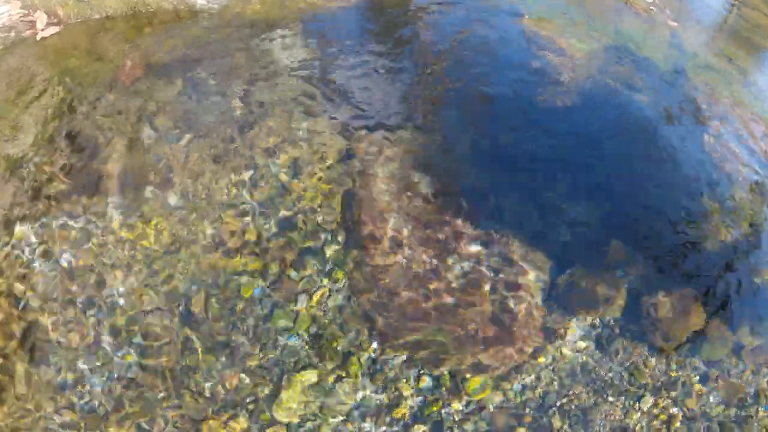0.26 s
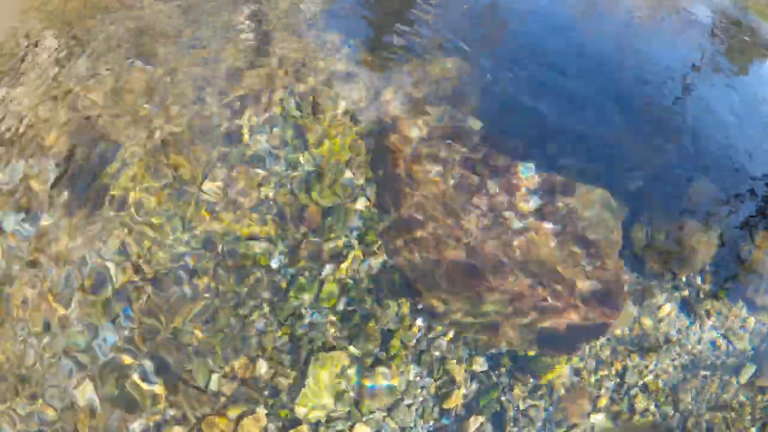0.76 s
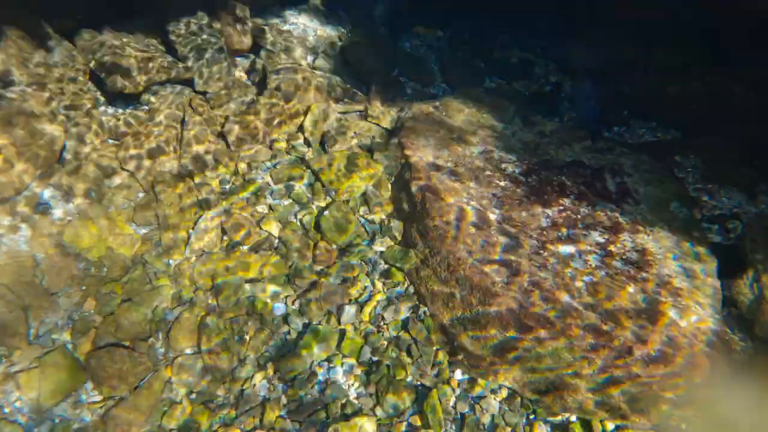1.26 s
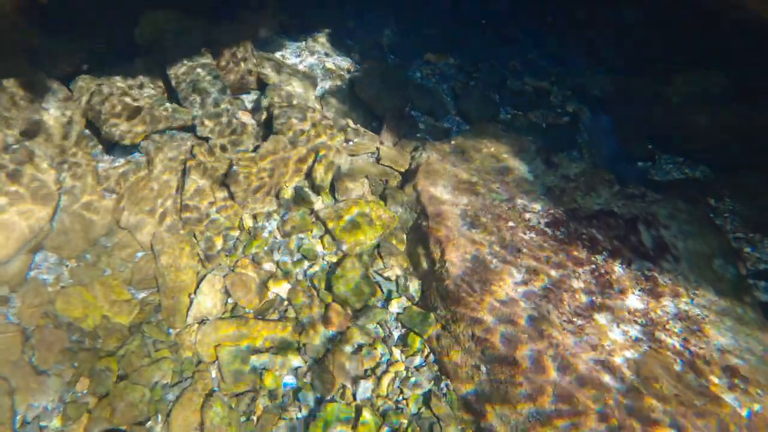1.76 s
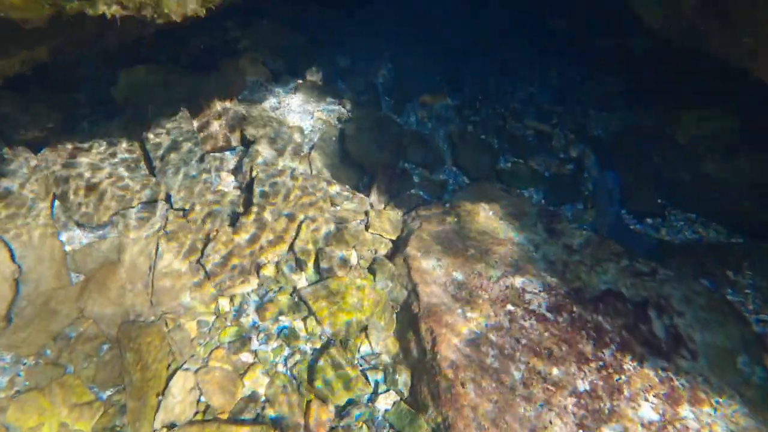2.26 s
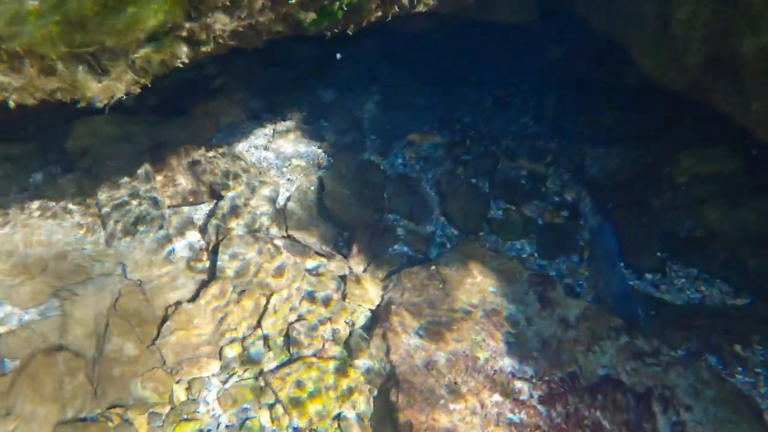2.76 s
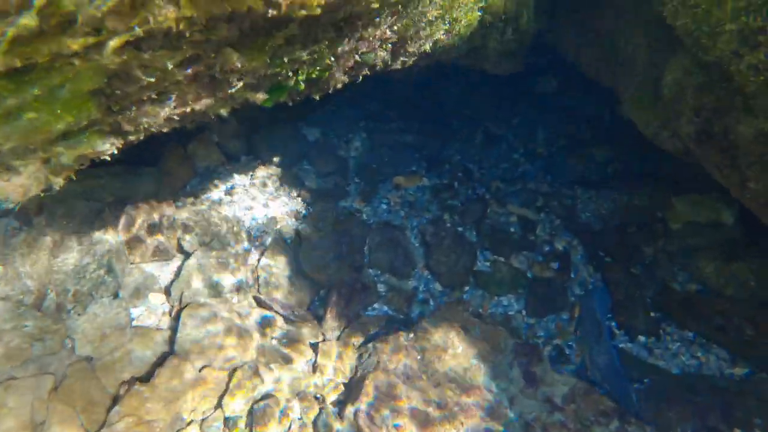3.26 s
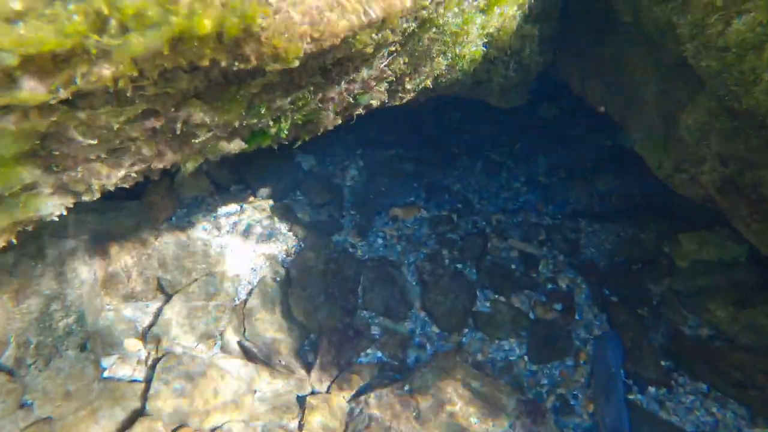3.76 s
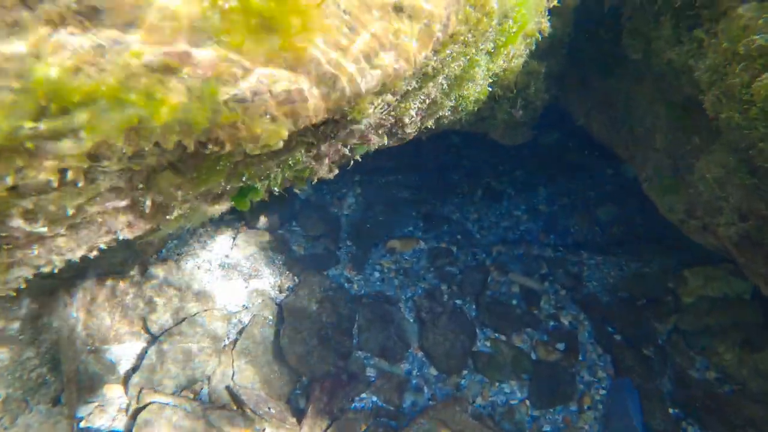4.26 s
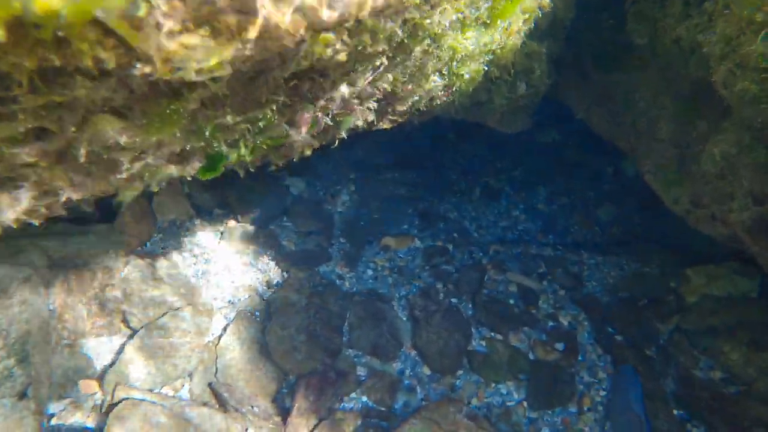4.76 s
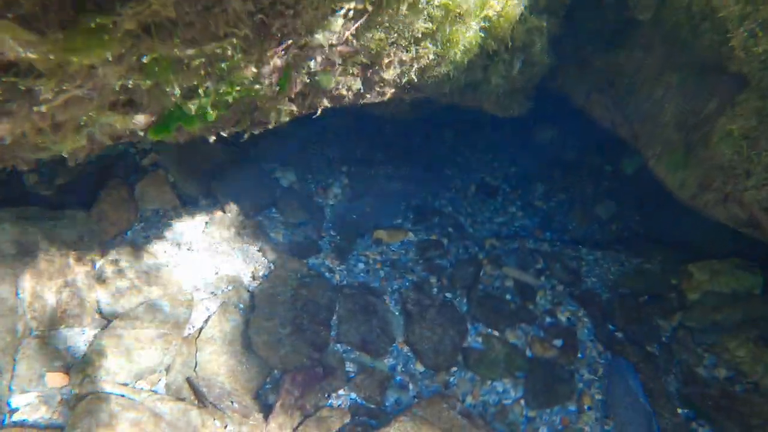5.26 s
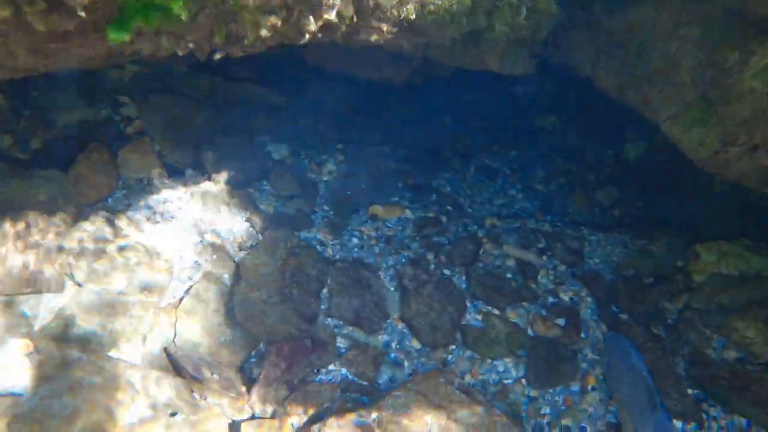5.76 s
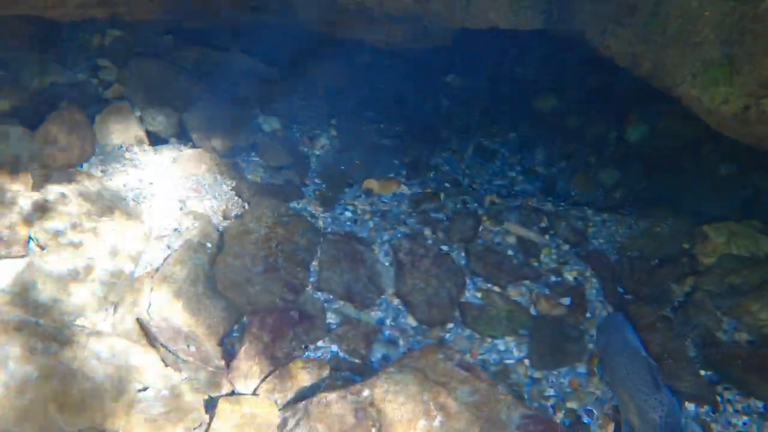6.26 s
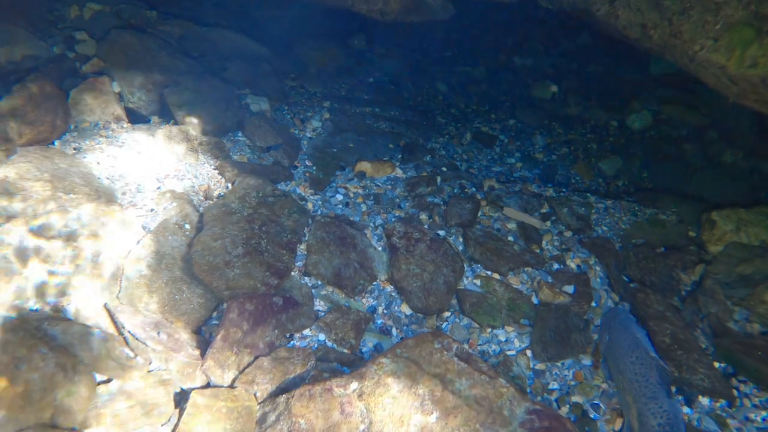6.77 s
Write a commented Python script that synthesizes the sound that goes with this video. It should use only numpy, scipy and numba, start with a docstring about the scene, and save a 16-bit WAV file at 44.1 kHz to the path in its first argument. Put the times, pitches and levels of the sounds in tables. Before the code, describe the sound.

A soft, low breeze blows across the microphone for the first second. At about 1.1 seconds drops patter and a short, bright splash follows as the camera enters a pool, going under at 1.3 with a loud gulp and a rush of bubbles lasting until about 1.9. From here the sound is close and muffled. An uneven deep rumble continues throughout, with a wavering low throb until 3.5 seconds. The flow is quieter between 2 and 3.4, with only a few small pops. Gurgling surges come at about 3.7 and 4.2, followed by busy bubble pops and clicks until 5.5, while a hollow watery resonance gradually sinks in pitch. The bubbling then thins out. From 6.5 to 7 seconds the camera pole creaks in a quick run of dry knocks with faint scraping over the rumble.

```python
"""A camera dipped into a spring pool

A camera on a hollow pole is lowered through a breeze, slaps into the water and is pushed under.
Eddies shed from its case throb and rumble, and the flow excites an air pocket whose resonances sink
with depth. Bubbles break loose from the joints and ring as damped oscillators; late on, the pole creaks."""
import sys
import numpy as np
from scipy import signal
from scipy.io import wavfile
from scipy.ndimage import uniform_filter1d, map_coordinates
from numba import njit

SR = 44100
rng = np.random.default_rng(int(sys.argv[2]) if len(sys.argv) > 2 else 0)


def put_to_file(sound):
    """Save the sound as 16-bit audio at rate SR, in the file named by the first command-line argument."""
    columns = np.atleast_2d(sound).T  # one column per channel
    safe = np.clip(columns, -1, 1)
    whole_steps = np.round(safe * 32767)
    wavfile.write(sys.argv[1], SR, whole_steps.astype(np.int16))


N = 309582
TIME = np.arange(N) / SR
UNDER_S = 1.3  # the case goes under


def undb(db):
    return 10 ** (np.asarray(db) / 20)


def unit(x):
    return x / np.sqrt(np.mean(x ** 2))


def curves(table):
    """Linear interpolation of each column over time."""
    s, *columns = np.transpose(table)
    return [np.interp(TIME, s, c) for c in columns]


def during(table, fade_s=.054):
    """Trapezoidal gate, open over the span of a table."""
    start, end = table[0][0], table[-1][0]
    return np.interp(TIME, [start - fade_s, start, end, end + fade_s], [0, 1, 1, 0])


def swell(s, db, rise_s, fall_s):
    """Exponential growth and decay, 20 dB per rise or fall time."""
    t = TIME - s
    return undb(db - 20 * np.maximum(-t / rise_s, t / fall_s))


def walk(rate):
    """Slow random modulation: smoothed steps, rate per second, spread near 1."""
    hold = int(SR / rate)
    steps = np.repeat(rng.standard_normal(N // hold + 1), hold)
    return 1.367 * uniform_filter1d(uniform_filter1d(steps, hold), hold)[:N]


@njit
def resonator(x, hz, width):
    """State-variable band-pass with unit gain at its moving centre."""
    y, band_state, low_state = np.empty(len(x)), 0., 0.
    for i in range(len(x)):
        g, damping = np.tan(np.pi * hz[i] / SR), width / hz[i]
        v = (band_state + g * (x[i] - low_state)) / (1 + g * (g + damping))
        band_state, low_state = 2 * v - band_state, low_state + 2 * g * v
        y[i] = damping * v
    return y


def band(hz, width):
    """Band-limited noise from four resonators in cascade, rms 1."""
    hz, x = hz + np.zeros(N), rng.standard_normal(N)
    for _ in range(4):
        x = resonator(x, hz, width)
    return unit(x)


def coloured(spectrum, swell_db, flicker_db, rate):
    """Amplitude-modulated noise: half-octave bands swell together and flicker independently."""
    hz, db = np.transpose(spectrum)
    out, common_db = 0, swell_db * walk(rate / 4)
    for f in hz[0] * 2 ** np.arange(0, np.log2(hz[-1] / hz[0]), .5):
        band_db = np.interp(np.log(f), np.log(hz), db) + 10 * np.log10(f)
        out += undb(band_db + common_db + flicker_db * walk(rate)) * band(f, .8 * f)
    return unit(out)


def ring(out, s, hz, db, t60, rough, rise_s, glide=0., kicks=12):
    """Add a damped oscillation to out; turbulent kicks perturb its phase and amplitude."""
    t = np.arange(int((max(t60, .002) + rise_s) * SR)) / SR
    start = max(int((s - rise_s / 2) * SR), 0)
    position = (kicks - 1) * t / t[-1]
    jitter, flutter = (rough * map_coordinates(row, [position], order=3)
                       for row in rng.standard_normal((2, kicks)))
    phase = 2 * np.pi * hz * t * (1 + glide * t / t[-1]) + 2 * jitter
    rise = np.sin(np.pi / 2 * np.minimum(t / rise_s, 1)) ** 2
    decay = undb(db - 60 * np.maximum(t - rise_s, 0) / (t[-1] - rise_s))
    out[start:start + len(t)] += (np.sin(phase) * (1 + flutter) * rise * decay)[:N - start]


def muffled(x, hz=3600):
    """Transmission loss: the wall of the case cuts the treble steeply."""
    return signal.sosfilt(signal.butter(6, hz, fs=SR, output="sos"), x)


def case_reverb(x, t60=.06, tail_db=-6.5):
    """Scattering: the walls of the case give each hit a short, dull tail."""
    t = np.arange(int(t60 * SR)) / SR
    tail = rng.standard_normal(len(t)) * undb(-60 * t / t60)
    scattered = signal.fftconvolve(x, tail / np.linalg.norm(tail))[:N]
    return x + undb(tail_db) * muffled(scattered)


# Wind spectrum: (frequency [Hz], relative density [dB])
WIND_SPECTRUM = [(20, -3.5), (60, -2), (150, -5), (250, -5), (400, -19.5), (800, -17.5), (1300, -23.5),
                 (2200, -34.5), (4000, -47.5), (6500, -44.5), (8500, -57), (11000, -75)]

def breeze():
    """Turbulence: air flows noisily round the case until it submerges."""
    gate = np.interp(TIME, [UNDER_S - .08, UNDER_S], [1, 0])
    return gate * undb(-39) * coloured(WIND_SPECTRUM, swell_db=.27, flicker_db=.57, rate=14.)


def crackle(rate):
    """Superposition: small bubbles ring at random times as they drift past."""
    out = np.zeros(N)
    for when, pitch, chance in rng.random((int(rate * N / SR), 3)):
        hz = 280 * 2 ** (1.9 * pitch)
        db = -2.6 * np.log(chance + 1e-9) - 8.1 * pitch
        ring(out, when * N / SR, hz, db, 10 / hz, rough=.33, rise_s=1.56 / hz, glide=.08)
    return unit(out)


# Air pocket resonances: (time [s], first [Hz], second [Hz])
POCKET_MODES = [(1.2, 1385, 2870), (3.7, 1379, 2840), (4.6, 1294, 2610), (5.5, 962, 2120), (6.0, 857, 1975),
                (6.3, 732, 1870), (7.02, 519, 1615)]
# Third resonance, waking with depth: (time [s], level re the second [dB])
THIRD_MODE = [(2.1, -24.5), (3.7, -14), (4.6, -11), (5.2, -15.5), (6., -13)]

def air_pocket(first_db, upper_db):
    """Cavity resonance: flow excites three modes of trapped air, which sink with depth."""
    first_hz, second_hz = curves(POCKET_MODES)
    first = undb(first_db) * band(first_hz, 500.)
    skirt = .75 * (second_hz / 2000) ** 3  # broader near the surface
    second = unit(band(second_hz, 600.) + skirt * band(.8 * second_hz, 1900.))
    third = undb(curves(THIRD_MODE)[0]) * band(1.62 * second_hz, 2000.)
    return first + undb(upper_db) * (second + third)


# Flow levels: (time [s], gurgle [dB], wash [dB], first pocket mode [dB], upper modes [dB])
FLOW_LEVELS = [(1.17,-45,-55,-42.5,-49), (1.26,-43.5,-49,-49.5,-49), (1.43,-37.5,-47.5,-58,-76.5),
               (1.56,-37,-45.5,-39.5,-59.5), (1.78,-33,-41.5,-48.5,-59), (1.95,-45,-52.5,-62.5,-69),
               (2.3,-50.5,-55.5,-70.5,-77), (2.5,-50,-59,-70,-74), (2.66,-49.5,-52.5,-59.5,-68.5),
               (2.8,-47,-52.5,-66,-75), (2.97,-44.5,-53.5,-64.5,-71.5), (3.2,-51.5,-54.5,-65,-75.5),
               (3.44,-43,-49,-64,-70), (3.7,-28.5,-41,-53,-62.5), (4.1,-46.5,-53,-52,-67),
               (4.4,-32,-47,-52.5,-63), (4.65,-30,-46,-44.5,-60), (5.2,-31.5,-47.5,-48,-60),
               (5.55,-34.5,-51.5,-42.5,-58), (5.9,-33,-53.5,-41.5,-57.5), (6.18,-34,-60.5,-46.5,-60),
               (6.33,-39,-69,-62.5,-65.5), (6.7,-43.5,-58,-60.5,-62), (7.02,-34.5,-56,-57,-59)]
# Gurgle spectrum: (frequency [Hz], relative density [dB])
GURGLE_SPECTRUM = [(110, -6), (160, -2), (250, 0), (350, -4), (500, -10), (750, -22)]

def flow():
    """Flow noise: water gurgles and washes along the case and drives the air pocket."""
    gurgle_db, wash_db, first_db, upper_db = curves(FLOW_LEVELS)
    grit = unit(undb(3.2 * walk(90)))
    gurgle = undb(gurgle_db) * coloured(GURGLE_SPECTRUM, swell_db=1.5, flicker_db=3., rate=30.)
    pocket = grit * air_pocket(first_db, upper_db)
    wash_hz = .52 * curves(POCKET_MODES)[0]
    wash = undb(wash_db) * (band(wash_hz, 700.) + crackle(rate=300))
    return during(FLOW_LEVELS) * (gurgle + wash + pocket)


# Eddy tone: (time [s], frequency [Hz], level [dB])
EDDY_TONE = [(1.27, 75.85, -37), (1.29, 77.1, -26.5), (1.34, 77.13, -22.5), (1.42, 66.2, -35),
             (1.62, 61.34, -17), (1.69, 61.7, -19.5), (1.75, 56.2, -19), (1.85, 55.6, -22.5),
             (1.9, 57.9, -39), (1.95, 63.1, -13.5), (2.1, 64.8, -26.5), (2.16, 66.5, -17),
             (2.37, 62.86, -25.5), (2.5, 67.2, -23.5), (2.64, 66.8, -20), (2.72, 61.54, -32),
             (2.75, 61, -20), (2.89, 61.43, -17), (2.96, 60.5, -32), (3.03, 59.9, -22), (3.16, 57.8, -27.5),
             (3.18, 57, -42), (3.29, 56.2, -22), (3.5, 62.2, -33)]
# Drag rumble: (time [s], deep band [dB], upper band [dB])
RUMBLE = [(1.29, -28, -31), (1.33, -36.5, -17), (1.46, -29, -35.5), (1.71, -28, -22.5), (1.75, -26.5, -32),
          (1.86, -22, -24), (2.04, -49.5, -30.5), (2.09, -23, -36), (2.18, -34, -26), (2.33, -31, -42),
          (2.39, -34, -27), (2.92, -33.5, -30), (3.02, -19.5, -30.5), (3.08, -32, -30), (3.16, -36.5, -40),
          (3.4, -38, -33), (3.47, -22, -33), (4.27, -20.5, -36), (4.74, -22, -27), (4.95, -17, -45),
          (4.98, -22.5, -29), (5.97, -23, -29.5), (6.13, -18, -35), (6.68, -26.5, -31.5),
          (6.73, -17, -37.5), (6.83, -18.5, -14.5), (6.89, -19.5, -41), (7.02, -14.5, -27.5)]

def drag():
    """Vortex shedding: the sinking case throbs with a wavering tone over an uneven rumble."""
    hz, tone_db = curves(EDDY_TONE)
    deep_db, upper_db = curves(RUMBLE)
    phase = 2 * np.pi * np.cumsum(hz * (1 + .07 * walk(25))) / SR
    deep = unit(np.tanh(.9 * band(28., 60.)))  # saturation evens out large swings
    upper = undb(upper_db + 3.96 * walk(12)) * band(75., 120.)
    throb = undb(tone_db + 2.2 * walk(14)) * np.sqrt(2) * np.sin(phase)
    rumble = undb(deep_db + .74 * walk(8)) * deep + upper
    return during(EDDY_TONE, .066) * throb + during(RUMBLE, .029) * rumble


# Surges: (time [s], level [dB], centre [Hz], rise [s], fall [s]); a negative fall ends one early
SURGES = [(1.3,-30,2900,.02,0.08), (1.35,-34.5,2400,.03,0.05), (1.374,-26.5,601.4,0.031,.02),
          (1.53,-43,1300,0.047,0.1), (1.586,-36.5,800,0.058,0.06), (1.63,-42,1700,.03,0.03),
          (1.7,-41.5,1100,0.051,-0.04), (1.8,-43.5,831,0.181,0.22), (1.854,-47,782.5,0.031,0.52),
          (1.54,-49.5,2800,.05,0.16), (1.63,-54,2500,.04,-0.02), (1.77,-47,2700,.08,0.1),
          (3.54,-36,830,0.06,0.17), (3.67,-35,750,.15,0.16), (3.75,-31.5,650,0.0584,0.06),
          (4.155,-36,900,0.031,0.25), (4.22,-36,550,.04,0.06)]

def slosh():
    """Bubble clouds: each surge into the gaps of the case rings a crowd of short-lived bubbles."""
    out = 0
    for s, db, centre_hz, rise_s, fall_s in SURGES:
        crowd, span_s = np.zeros(N), rise_s + fall_s
        for when, pitch, chance in rng.random((100, 3)):
            hz = min(centre_hz * 2 ** (1.9 * (pitch - .5)), 3000 + 900 * chance)
            bubble_db = -3.5 * np.log(chance + 1e-9) - 6.4 * pitch
            onset_s = s - rise_s + when * span_s
            ring(crowd, onset_s, hz, bubble_db, 16 / hz, rough=.26, rise_s=1.41 / hz, glide=.096)
        out += swell(s, db, rise_s, fall_s) * unit(crowd) * np.sqrt(span_s * SR / N)
    return muffled(out)


# Gulps of air: (time [s], peak level [dB], centre [Hz], rise [s], fall [s])
AIR_GULPS = [(1.33, -26.5, 168.6, 0.037, 0.27), (1.378, -13, 205, .025, 0.0442),
             (1.86, -26, 199.4, 0.035, 0.1), (3.075, -24, 98.2, 0.074, 0.03), (3.75, -26, 290, .04, .06),
             (4.21, -26, 330, .05, .06), (5.29, -28, 380, .04, .05), (5.455, -25, 360, .04, .06),
             (6.82, -23.5, 191.3, 0.0472, 0.1)]

def gulps():
    """Displacement: air escapes from the case in low bursts of noise."""
    return sum(swell(s, db, rise_s, fall_s) * band(hz, 1.4 * hz)
               for s, db, hz, rise_s, fall_s in AIR_GULPS)


def spray():
    """Broadband splash noise: spray swells until the slap, then dies away as its centre sinks."""
    level_db = np.interp(TIME, [1.041, 1.13, 1.224, 1.28, 1.38],
                         [-79, -55.5, -52.5, -62.5, -79], -200, -200)
    centre_hz = np.interp(TIME, [1.13, 1.28], [4200, 2900])
    fine_db = 2.5 - 60 * (TIME - 1.13) * (TIME < 2)
    grit = unit(undb(4 * walk(300)))
    return undb(level_db) * grit * (band(centre_hz, 3500.) + undb(fine_db) * band(7800., 8800.))


# Drops, then small bubbles: (time [s], relative ring level [dB], pitch [Hz], relative crack level [dB])
DROPS_AND_BUBBLES = [(1.0786, -24.5, 3340, -48), (1.0815, -29, 3300, -48), (1.0842, -30.5, 3654, -46),
                     (1.112, -35.5, 3480, -51), (1.1154, -28.5, 5050, -49), (1.1212, -27.5, 5170, -45),
                     (1.124, -14.5, 4200, -34), (1.132, -32, 4000, -47), (1.1414, -33, 2400, -52),
                     (1.1525, -27.5, 4400, -49.5), (1.1718, -34, 6930, -42.5), (1.185, -29, 2730, -32),
                     (1.196, -22, 3480, -49.5), (1.207, -34, 4370, -52), (1.216, -34.5, 4500, -54.5),
                     (1.2332, -9.5, 2886, -35.5), (1.2503, -30, 3410, -49.5), (1.2816, -25, 2530, -50),
                     (1.2864, -31, 2970, -49), (1.3029, -15.5, 3580, -54.5), (1.3038, -16, 2913, -53),
                     (1.3214, -24, 3700, -64), (1.334, -24, 3900, -70), (1.349, -30, 4300, -75),
                     (1.362, -30, 3700, -75), (1.372, -32, 3700, -70)]

def drops_and_bubbles():
    """Free oscillation: drops crack and ring; once the case is under, small bubbles ring high and clear."""
    out = np.zeros(N)
    for s, db, hz, crack_db in DROPS_AND_BUBBLES:
        rough, overtone_db = (.9, -16) if s < UNDER_S else (.2, -30)
        ring(out, s, hz, db - 8, .0306, rough=rough, rise_s=.0012, kicks=30)
        ring(out, s, 1.5 * hz, db + overtone_db, .014, rough=1.2, rise_s=.0007, kicks=36)
        ring(out, s, 8000., crack_db, .009, rough=1.3, rise_s=.0006, kicks=24)
        ring(out, s, 12000., crack_db - 9.5, .005, rough=1.2, rise_s=.00024)
    return out


# Knocks of the pole: (time [s], level [dB], pocket re knock [dB], case re knock [dB])
POLE_KNOCKS = [(6.5363, -21, 6.5, -4.5), (6.5902, -18.5, -10.5, -2.5), (6.636, -18.5, -11.5, -1.5),
               (6.6841, -18, -2.5, -6.5), (6.8195, -17.5, -18, -5.5), (6.845, -13.5, -19, -6),
               (6.876, -22.5, -10, -4), (6.9146, -22, -22.5, -3.5), (6.9549, -33.5, -3, -7),
               (6.964, -17, -3, -15.5), (7.0004, -26, -7, -9)]
# Modes of the case: (frequency [Hz], relative level [dB], decay time re t60 [ratio])
CASE_MODES = [(1210, -8, .3), (1430, -7, .4), (1630, -5, .4), (1600, -19, 1.4), (2110, -15, .25),
              (2950, -30, .4), (4300, -50, .2)]
# Rubbing between knocks: (time [s], level [dB])
RUBBING = [(6.5, -66), (6.535, -50), (6.7, -54), (6.73, -69), (6.79, -67.5), (6.82, -52), (6.93, -57),
           (6.95, -68)]

def pole_creak(t60=.054):
    """Modal response: dry snaps of the pole ring the case and the pocket, over a narrow scrape."""
    out, pocket_hz = np.zeros(N), curves(POCKET_MODES)[0]
    for s, db, pocket_db, case_db in POLE_KNOCKS:
        ring(out, s, 850., db - 1, .008, rough=.57, rise_s=.0013)  # snap
        ring(out, s, pocket_hz[int(s * SR)], db + pocket_db, 1.2 * t60, rough=.21, rise_s=.0025)
        for hz, mode_db, share in CASE_MODES:
            ring(out, s, hz, db + case_db + mode_db, share * t60, rough=.5, rise_s=.0026)
    scrape = undb(curves(RUBBING)[0] + 3 * walk(70)) * band(1613, 330.)
    return muffled(out + during(RUBBING, .01) * scrape, hz=4800.)


# Bubbles leaving the joints, levels relative: (time [s], low ring [Hz], low level [dB], middle ring [Hz],
# middle level [dB], high level [dB], tick level [dB], onset softness [-], ring length [ratio])
BUBBLES = [(1.154,418,-38,1620,-25,-40,-28,4.08,0.9), (1.17,1127,-33,1692,-25.5,-34,-38.5,4.3,1.5),
           (1.184,659,-35,1354,-25,-25,-34,4,0.74), (1.219,356,-25.5,1900,-24,-23.5,-32,2.9,0.42),
           (1.228,300,-15.5,1310,-27,-37.5,-49,1.79,0.33), (1.2333,1020,-15,2180,-22,-14,-36,1.28,0.37),
           (1.293,761,-21,2502,-21.5,-15,-31,2.56,0.716), (1.307,312.3,-15.5,1297,-22,-25.5,-41.5,2.6,0.46),
           (1.314,701,-23.5,1910,-19.5,-32,-47.5,2.8,.9), (1.333,641,-21,1844,-18,-8,-45,2.5,0.69),
           (1.349,1310,-12.5,2170,-18.5,-32,-64.5,3.3,0.91), (1.363,280,-14,1234,-22,-43,-56,3.7,0.8),
           (1.375,590,-8.5,1353,-19.5,-54,-58,4.27,0.58), (1.398,304,-19.5,981,-33,-52,-87,3.8,1.05),
           (1.515,435,-22.5,1310,-28,-38.5,-69,3.9,1.37), (1.543,1113,-31,1530,-33,-31,-70,8,0.77),
           (1.561,687,-14.5,1375,-34,-46,-67.5,3.9,1.4), (1.574,782.7,-18.5,1410,-24,-50,-72,5.64,1.5),
           (1.586,866,-18.5,1290,-35,-36.5,-68,5,0.82), (1.622,298,-32,1915,-22,-49,-71.5,9.9,1.06),
           (1.637,910,-27.5,2040,-12,-38,-60.5,3.4,0.96), (1.681,1008,-26,1313,-22,-56,-54,4.75,1.08),
           (1.737,301.7,-29,1713,-28.5,-32.5,-66,2.9,1.6), (1.76,750,-19,1460,-30,-44.5,-72,2.8,1.14),
           (1.768,810,-25,1603,-26,-20.5,-67,5.4,1.3), (1.785,862,-16,1527,-21,-50,-60.5,3.75,1.29),
           (1.805,749,-17.5,2010,-31,-20.5,-42,4,0.88), (1.819,312,-16.5,1491,-38,-47.5,-65,4.3,0.99),
           (1.851,783,-16,1356,-27.5,-59,-76,3.8,1.526), (1.965,300,-29,1846,-33,-37,-56,4.4,0.88),
           (1.977,511.3,-31,1455,-37.5,-35.5,-56,4,0.76), (1.998,590,-36,2250,-45,-39,-67,3.1,0.6),
           (2.03,501.3,-42,1438,-45,-52,-72.5,3.33,0.656), (2.086,603,-40.5,1191,-48,-56.5,-77.5,4.27,0.53),
           (2.125,504,-43,1242,-45,-62.5,-83,3.6,0.68), (2.344,498,-40.5,2310,-49,-54.5,-78,3.6,0.45),
           (2.583,318,-26.5,2025,-22.5,-34,-40.5,2.45,0.96),
           (2.653,437,-45.5,1366,-41.5,-45.5,-60.5,3.2,0.87),
           (2.682,497.9,-44,1350,-40,-56,-70.5,4.2,0.697), (2.92,545,-35.5,1005,-34.5,-61,-84,6.9,0.73),
           (2.976,500,-38,1016,-39,-57,-81,4.6,0.64), (3.273,902,-22.5,1601,-18.5,-19.5,-37.5,2.93,0.82),
           (3.32,508,-39,1170,-41,-51,-78,3.5,0.68), (3.345,352.7,-39,1750,-41,-46,-79,3.6,0.74),
           (3.368,466,-39,1407,-40,-47.5,-65,3.9,0.98), (3.545,934,-25,1440,-40,-66,-64.5,5.72,0.93),
           (3.718,418,-8.5,1606,-51,-43,-65,4.9,0.755), (3.741,746.3,-15.5,1312,-29,-52,-55,4,0.98),
           (3.781,548,-33,1408,-33.5,-50,-76,8.35,1.2), (3.81,375.4,-20,2050,-36,-44,-71,4.3,0.81),
           (3.831,295,-27,1283,-27.5,-54,-58,4.4,1), (3.907,389.3,-27.5,1330,-32,-48.5,-62,5.44,0.56),
           (4.011,294,-30.5,1320,-36,-47,-69,4.17,0.86), (4.09,298,-26.5,1305,-41,-45,-61,4.1,0.72),
           (4.146,702,-28,1390,-24,-60,-78,10.3,0.68), (4.157,293,-8.5,1084,-20.5,-60.5,-64,4,0.63),
           (4.202,281,-8,2007,-26.5,-42,-73,4.2,0.76), (4.212,554,-13.5,1417,-15.5,-56,-84,3.95,1.4),
           (4.293,648,-29,1429,-25.5,-70,-62,8.77,0.94), (4.34,574,-23,1355,-36,-52,-76,4.6,0.78),
           (4.388,563,-21,921,-37,-59,-75,5.8,1), (4.452,298,-18,1274,-30.5,-51,-60,7.6,0.815),
           (4.54,293,-17,1301,-31,-40,-55,5.9,0.86), (4.599,770,-11.5,1960,-22,-20,-48,4.3,0.734),
           (4.617,307,-10,1377,-15.5,-26,-44,4.11,0.55), (4.626,804,-28,1840,-32,-49,-71,5.1,1.63),
           (4.675,601,-26.5,1276,-34,-45,-65,8.35,0.9), (4.788,586,-12,1680,-21.5,-55,-69,3.6,0.98),
           (4.849,391,-15.5,1777,-15,-62,-66,4.2,0.78), (4.985,345,-13,1260,-40,-53,-71,4.1,0.89),
           (5.048,597,-22,1678,-35,-38,-72,9,0.93), (5.062,1076,-22,1750,-26,-19.5,-62.5,4.2,0.89),
           (5.1,473,-12.5,1860,-21.5,-45,-65.5,4,0.51), (5.129,320,-15.5,1219,-28,-45,-60,5.1,0.83),
           (5.168,355,-14,1203,-38,-50,-70,5.3,0.8), (5.207,505,-33,1100,-35,-52,-79,4.2,0.73),
           (5.241,442,-17,1150,-26,-34.5,-69.5,5.8,0.64), (5.266,454,-12.5,1120,-35.5,-47,-73,4.9,0.56),
           (5.283,810,-9.5,1571,-18.5,-63,-90.5,3.5,1.12), (5.372,337.6,-19.5,1140,-30,-45,-67,3.6,0.7),
           (5.389,501,-24.5,1180,-34.5,-47,-72,3.9,0.59), (5.442,456,-9,1750,-26.5,-52,-78,3.7,0.75),
           (5.465,360,-7.5,1083,-28,-36.5,-64.5,4.1,0.74), (5.8,547.4,-19.5,1307,-42,-58,-72.5,6.1,0.91),
           (5.883,300,-29,1316,-49.5,-55,-69.5,5.3,.9), (5.973,985,-26.5,1273,-52,-69,-71,4.08,0.88),
           (6.088,498,-17.5,1396,-20,-69,-71,3.4,0.64), (6.221,795,-22.5,1629,-54.5,-59,-68,4.9,1),
           (6.307,396,-43.5,1440,-43,-49,-67,2.5,0.46), (6.468,396,-21.5,745,-41.5,-77,-82,5.2,0.84),
           (6.979,307,-18,896,-48,-75,-84,7.8,1.55)]

def bubble_pops():
    """Damped resonance: a bubble rings at three pitches, higher ones shorter, with a thud and a tick."""
    body, ticks = np.zeros(N), np.zeros(N)
    for s, low_hz, low_db, mid_hz, mid_db, high_db, tick_db, softness, length in BUBBLES:
        t60 = length * (.033 + 4.3 / low_hz)  # a base time plus 4.3 cycles
        high_hz = 2962 * (1 + rng.standard_normal() / 40)
        rise_s = max(softness, 2) / 800
        ring(body, s, low_hz, low_db - 4.5, t60, rough=.25, rise_s=rise_s, glide=.03)
        ring(body, s, mid_hz, mid_db - 6.5, .8 * t60, rough=.32, rise_s=1.5 * rise_s, glide=.02)
        ring(body, s, high_hz, high_db - 11, .5 * t60, rough=.3, rise_s=1.5 * rise_s)
        # brief rough rings fill the gaps between the three pitches
        lower_hz, upper_hz = np.sqrt(low_hz * mid_hz), np.sqrt(mid_hz * high_hz)
        ring(body, s, lower_hz, (low_db + mid_db) / 2 - 5, .011, rough=.77, rise_s=.796 * rise_s)
        ring(body, s, upper_hz, (mid_db + high_db) / 2 - 9.5, .014, rough=.6, rise_s=rise_s)
        # thud and tick on the case
        ring(body, s, 850, mid_db - 8.5, .016, rough=.8, rise_s=rise_s, kicks=16)
        ring(ticks, s + .001, 5000., tick_db - 7, .014, rough=.55, rise_s=.0025, kicks=14)
        ring(ticks, s + .001, 3700., (high_db + tick_db) / 2 - 12, .012, rough=.7, rise_s=.002)
    return muffled(body) + ticks


def scene():
    """Superposition: all sources sum in one channel; pops and creaks reverberate in the case."""
    surface = breeze() + spray() + drops_and_bubbles() + gulps() + slosh()
    underwater = drag() + flow() + case_reverb(bubble_pops())
    creak = case_reverb(pole_creak(), t60=.075, tail_db=-11.5)
    return (surface + underwater + creak)[None, :]


def record(dry):
    """Soft saturation rounds the peaks; faint preamp hiss is added and a low-pass cuts the top."""
    wet = np.tanh(.82 * dry) / .74 + undb(-107) * rng.standard_normal(N)
    return signal.sosfilt(signal.ellip(8, .2, 70, 15700, fs=SR, output="sos"), wet)


dry = scene()
out = record(dry)
put_to_file(out)
```